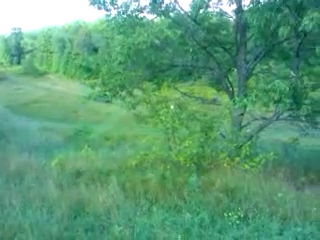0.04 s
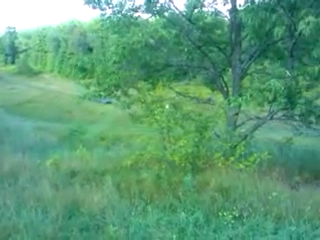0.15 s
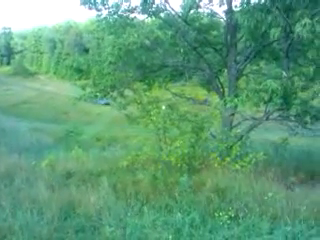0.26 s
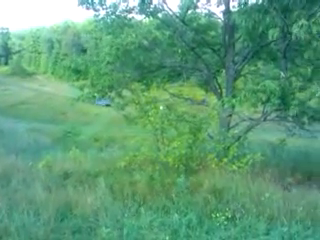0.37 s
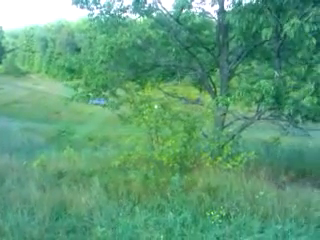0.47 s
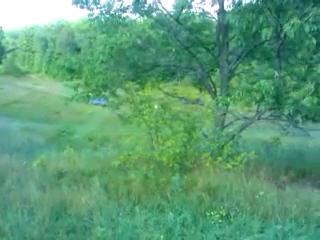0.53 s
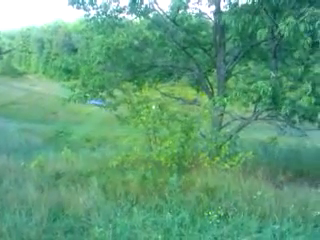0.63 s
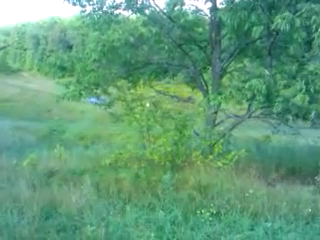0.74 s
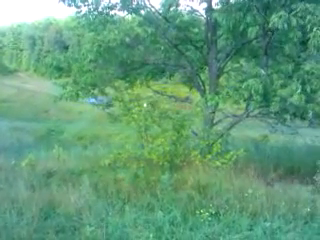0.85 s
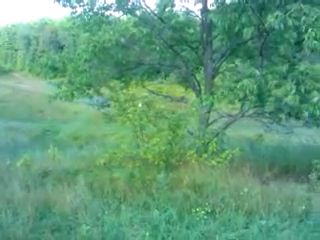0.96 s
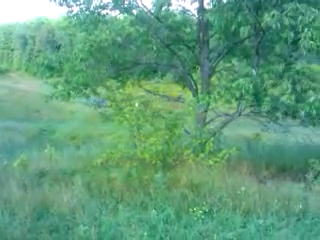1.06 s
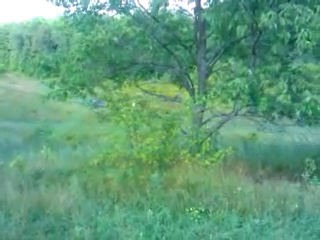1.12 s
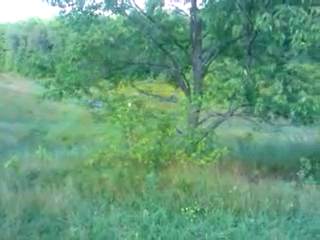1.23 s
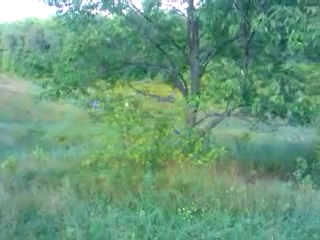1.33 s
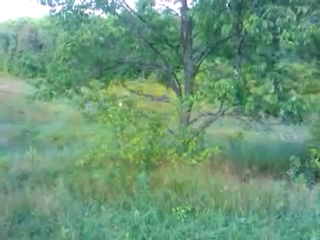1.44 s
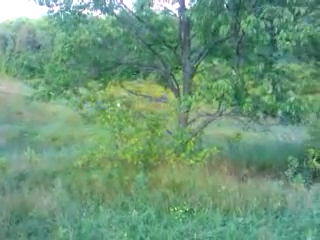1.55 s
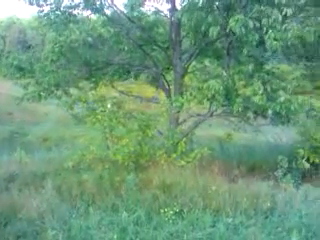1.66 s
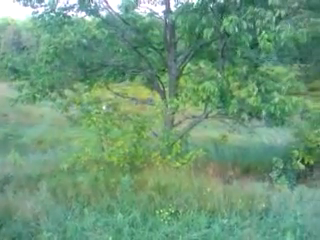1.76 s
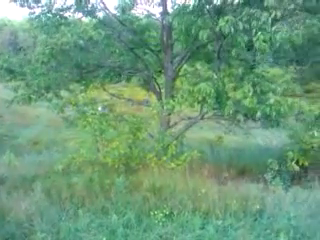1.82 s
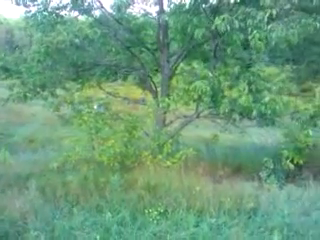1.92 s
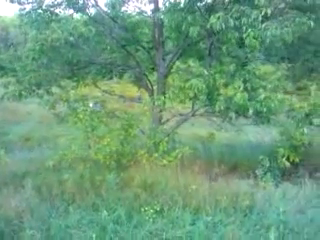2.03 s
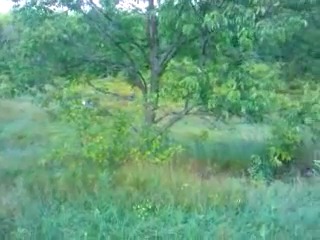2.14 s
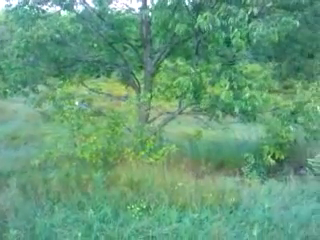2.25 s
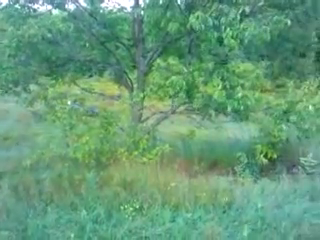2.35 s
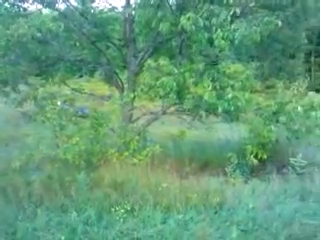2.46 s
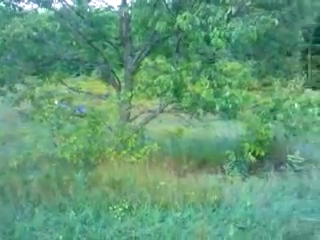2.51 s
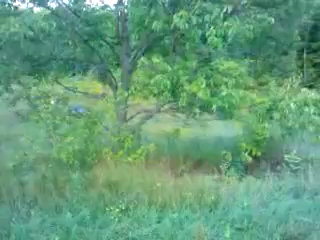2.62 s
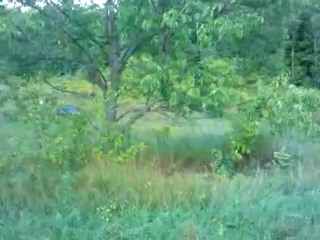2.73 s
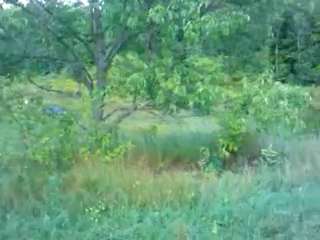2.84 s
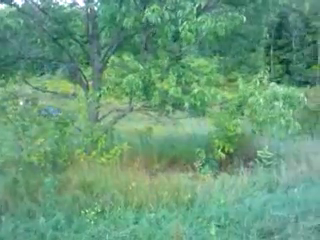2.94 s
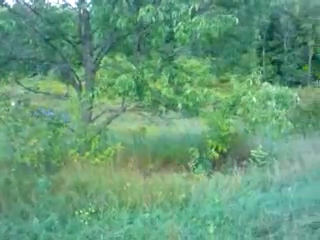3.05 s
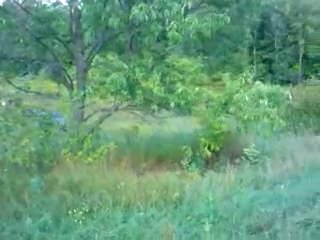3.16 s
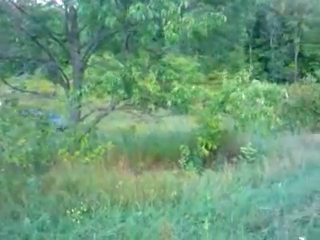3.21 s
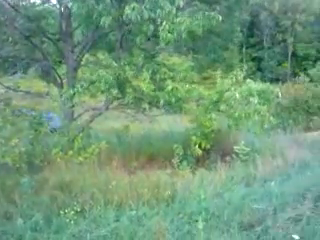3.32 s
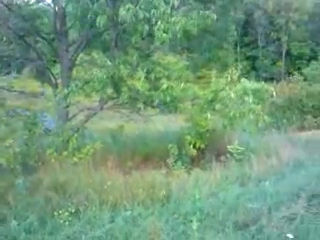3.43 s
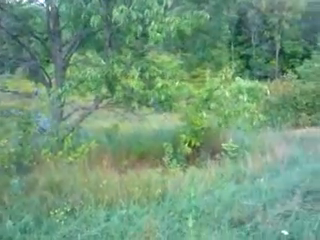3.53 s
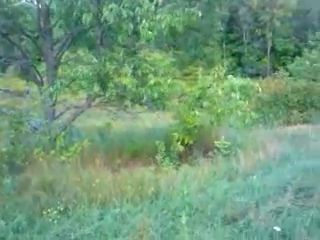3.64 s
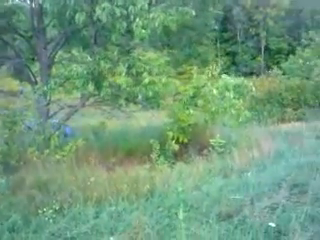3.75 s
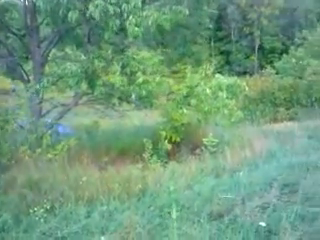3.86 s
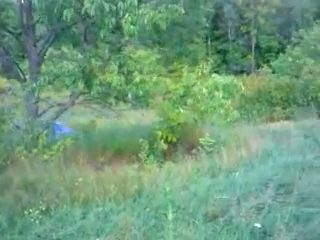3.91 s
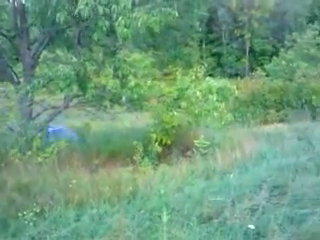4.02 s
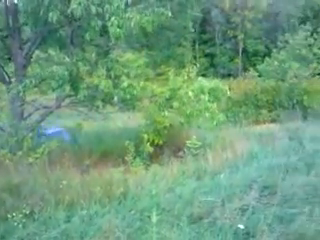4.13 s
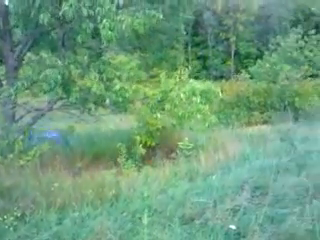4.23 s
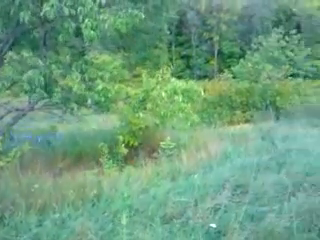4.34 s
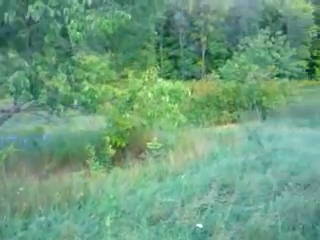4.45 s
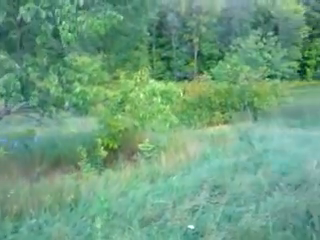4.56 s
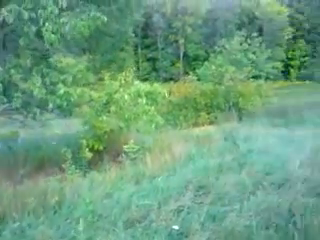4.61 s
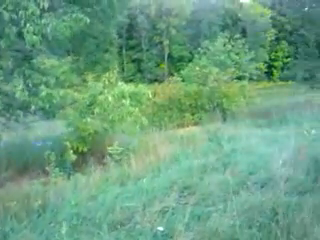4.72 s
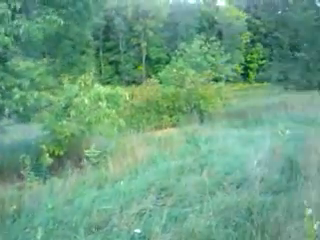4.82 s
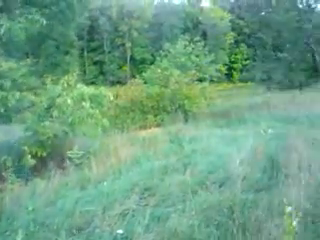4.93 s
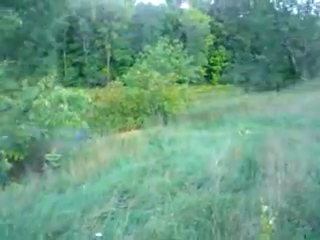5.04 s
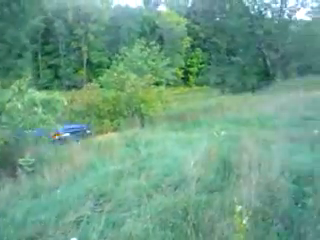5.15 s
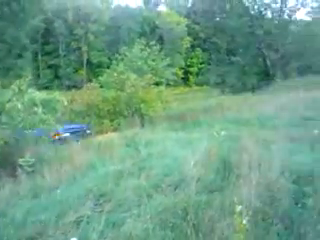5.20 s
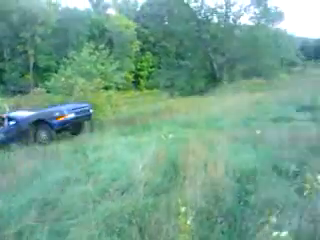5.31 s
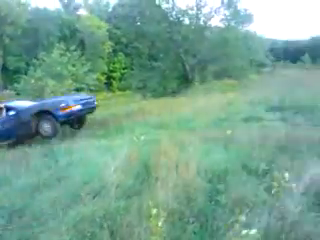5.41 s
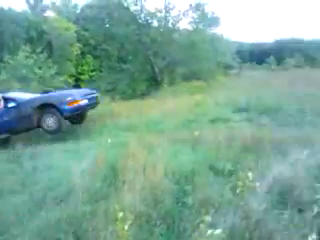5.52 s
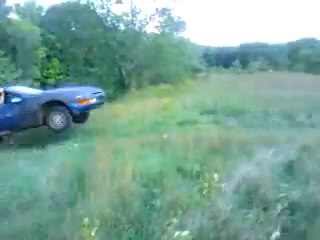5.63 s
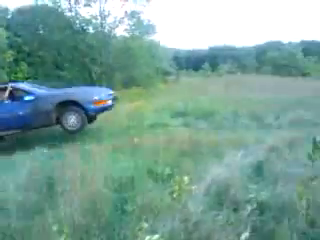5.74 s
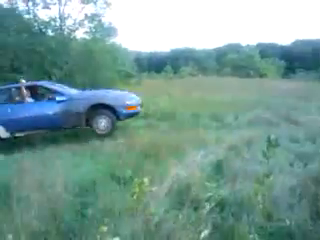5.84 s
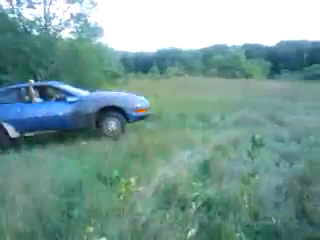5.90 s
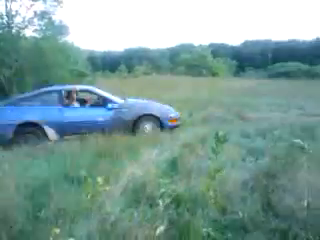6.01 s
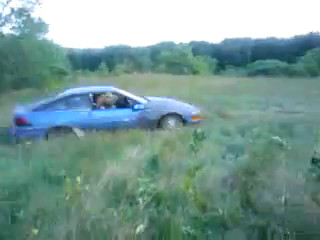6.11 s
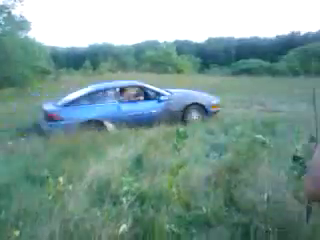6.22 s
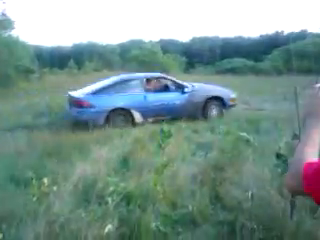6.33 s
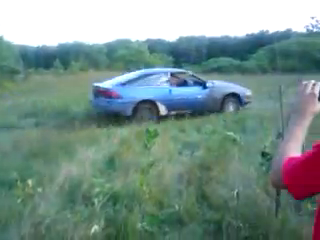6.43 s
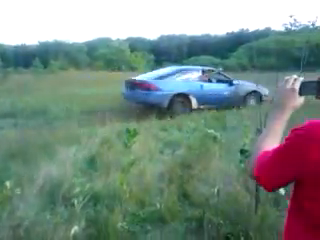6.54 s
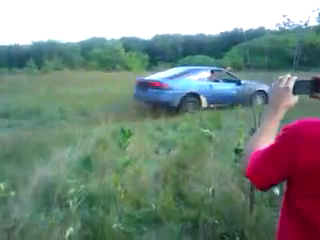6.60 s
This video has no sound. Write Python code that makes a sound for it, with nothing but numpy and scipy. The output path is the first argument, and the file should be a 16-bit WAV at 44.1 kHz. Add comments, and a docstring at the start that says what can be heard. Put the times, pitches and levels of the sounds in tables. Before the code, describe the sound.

For the first second and a half, a small car's engine drones faintly across a field, rising in pitch, while grass stirs and a hand knocks softly on the microphone. The engine drops away briefly, then gives two raspy throttle blips around 2 seconds. From 2.5 seconds it pulls hard, the blown exhaust buzzing harshly with short clanks of loose metal. It lifts near 4 seconds, then comes back louder with a low exhaust note and tyres pounding the turf, the rasp dipping just before 5 seconds. The wheels thump onto a jump at about 5.4 seconds, and the engine revs up to a howl as the car passes a few metres away, overloading the dull microphone. It lands at about 6.2 seconds with a thud, a clank and a throbbing exhaust boom, and is still driving on at 6.7 seconds.

```python
"""A small four-cylinder car with a blown exhaust, driven hard over a grass field, heard from the edge.
Gas puffs through the leak and rasps at each stab of the throttle; the silencer growls, the tailpipe
booms, loose metal clanks and the tyres pound over tussocks. The car revs over a jump about four metres
away, intake howling, and lands. At first the grass stirs and the hand-held camera knocks softly;
its dull microphone overloads as the car passes."""
import sys
import numpy as np
from scipy import signal
from scipy.fft import rfft, irfft, next_fast_len
from scipy.io import wavfile
from scipy.ndimage import uniform_filter1d

SR = 44100
rng = np.random.default_rng(int(sys.argv[2]) if len(sys.argv) > 2 else 0)


def bounce(signal):
    """Save signal as a 16-bit WAV file at the path given by the first command-line argument."""
    frames = np.transpose(np.atleast_2d(signal))
    limited = np.clip(frames, -1, 1)
    pcm = np.round(limited * 32767).astype(np.int16)
    wavfile.write(sys.argv[1], SR, pcm)


N = 294096
TIME = np.arange(N) / SR

# Engine speed. Each row: time in seconds, firings per second.
FIRING_RATE = [(0, 121), (1.45, 154), (1.8, 80), (2.1, 92.5), (3.0, 87.6), (3.87, 102.7), (4.1, 95),
               (4.27, 114.5), (4.42, 110), (4.6, 114), (4.73, 109), (5.05, 116), (5.2, 126.5), (5.49, 107),
               (5.68, 140), (5.87, 171), (6.02, 184), (6.12, 179), (6.28, 168), (6.39, 156), (6.55, 151),
               (6.67, 164)]
# Stabs of the throttle. Each row: opening and closing time in seconds, then the rasp's drive in dB at each.
THROTTLE_STABS = [(1.831, 2.036, 2.5, -9.5), (2.101, 2.201, 4, -11), (2.486, 3.912, -1, -3.5),
                  (4.149, 5.522, -7, -7.5), (5.531, 6.031, -7, -7), (6.052, 6.316, -13, -9),
                  (6.367, 6.401, 2.5, -14), (6.438, 6.66, -19, -36.5)]
# The leak's broad resonance. Each row: frequency in Hz, relative level in dB.
LEAK_SPECTRUM = [(100, -31), (250, -27.5), (450, -21.5), (720, -16), (950, -13.5), (1150, -2.5),
                 (1350, 8.5), (1570, 3.5), (1850, 11.5), (2150, 8.5), (2400, 7), (2700, -2.5), (3250, -6.5),
                 (3700, -16), (4200, -28)]
# Tone of the rasp as the car turns. Each row: time in seconds, then low band, shoulder and top band
# in dB against the rasp's core.
RASP_TONE = [(0, -9.5, -17, -11.5), (1.4, -10.5, -13, -19), (1.6, -13.5, -2, -15), (2.1, -10.5, -18, -11),
             (2.65, -14.5, -9.5, -19), (3.1, -8.5, -18, -14.5), (3.65, -11, -7.5, -19),
             (4.4, -19, -28.5, -14), (5.5, -14, -17, -13.5), (5.75, -11.5, -13, -9),
             (6.67, -7, -17.5, -15.5)]
# Narrow exhaust resonances. Each row: pitch in Hz when cold, pitch in Hz when hot, relative level in dB.
EXHAUST_RINGS = [(1414, 1560, -6), (1967, 2230, -6), (2430, 3170, -14.5)]
# A tree, then a bushy hollow, screen the rasp from the microphone.
# Each row: centre in seconds, loss in dB, half length in seconds.
COVER = [(3.214, 3.5, .28), (4.81, 9.0, 0.18)]
# Echoes off the edge of the wood. Each row: delay in seconds, gain in dB.
TREE_ECHOES = [(.023, -16.5), (.047, -8.5), (.083, -34.5), (.131, -14)]
# The tailpipe note. Each row: multiple of the firing rate, relative dB from the front, then from behind.
PIPE_HARMONICS = [(1, -20, -25), (1.25, -23.5, -23.5), (1.5, -24.5, -16.5), (1.75, -20, -5), (2, -4, -5.5),
                  (2.25, -18.5, -23), (3, -16, -17.5), (4, -22, -20.5), (5, -19.5, -39.5)]
# The note swells under load. Each row: start and end in seconds, then the gain in dB at each.
PIPE_SWELLS = [(0, 1.43, -35, -38.5), (2.5, 3.9, -38, -28), (4.17, 4.33, -19, -18),
               (4.46, 4.64, -21.5, -17.5), (4.72, 5.04, -18, -19.5), (5.2, 5.85, -17, -31.5),
               (6.07, 6.33, -18.5, -9), (6.46, 6.67, -18.5, -19.5)]
# Tyres on turf. Each row: frequency in Hz, relative level in dB.
TYRE_SPECTRUM = [(20, -31.5), (40, -14.5), (80, 1.5), (160, -3), (300, 2.5), (600, 1), (1500, -31)]
# The wheels hit a bump and the ramp, leave it, land and rebound.
# Each row: centre in seconds, level in dB at the closest distance, half length in seconds.
WHEEL_JOLTS = [(4.264, -30.5, 0.12), (5.35, -24, 0.096), (5.643, -24.5, 0.066), (5.87, -37, 0.028),
               (6.19, -24, .07), (6.55, -34.5, 0.23)]
# Leaves and tall grass all round. Each row: frequency in Hz, relative level in dB.
FOLIAGE_SPECTRUM = [(30, -27), (80, -14.5), (180, -9.5), (280, 4.5), (450, 2.5), (640, 3), (900, -16),
                    (1350, 6), (2100, -16.5), (3000, -14), (3600, -7.5), (4200, -26)]
# Stalks near the microphone. Each row: centre in seconds, level in dB, pitch in Hz, half length in seconds.
GRASS_RUSTLES = [(0.014, -47, 2190, 0.015), (0.275, -48, 1490, 0.017), (0.433, -54, 2560, 0.029),
                 (0.574, -46, 1450, .015), (0.667, -48, 2450, 0.012)]
# The hand shifts on the camera. Each row: time in seconds, relative peak in dB, pitch in Hz.
HAND_KNOCKS = [(0.058, -34, 318), (0.136, -33, 417), (0.163, -38, 221), (0.228, -42, 277),
               (0.294, -36.5, 339), (0.363, -32.5, 325), (0.403, -29.5, 298), (0.434, -27.5, 297),
               (0.478, -31.5, 310), (0.535, -30.5, 300), (0.633, -39, 258), (0.662, -36, 264),
               (0.7, -40, 251), (1.055, -24.5, 288), (1.725, -44, 272), (1.825, -33, 278)]
# Loose metal and sharp exhaust cracks.
# Each row: start in seconds, relative peak in dB, pitch in Hz, seconds to fall by 60 dB.
METAL_CLANKS = [(1.821, -23, 1690, .015), (1.935, -16, 2110, .015), (2.111, -35, 2030, 0.015),
                (2.484, -21.5, 1930, .03), (2.508, -24, 1900, .012), (2.639, -7.5, 1950, 0.01),
                (2.722, -7.5, 2136, 0.022), (2.855, -9, 1850, 0.0109), (2.983, -9.5, 1840, 0.012),
                (3.19, -21, 3140, 0.034), (3.314, -10, 2290, 0.041), (3.356, -8, 1910, 0.0077),
                (3.676, -9.5, 1610, .06), (3.718, -8.5, 1910, 0.0094), (4.142, -21, 1940, .015),
                (4.176, -21.5, 1910, .011), (4.400, -6, 2150, 0.068), (4.508, -14, 1920, 0.0084),
                (4.538, -6, 2160, .015), (4.561, -7.5, 1544, .015), (4.721, -13.5, 1720, .02),
                (5.035, -20, 1770, .015), (5.265, -4.5, 1580, 0.014), (5.281, -2, 1760, 0.0087),
                (5.425, -3, 1710, .02), (6.222, -6, 1375, 0.11), (6.398, -8, 1660, 0.028)]
# Brief tones in the rasp. Each row: centre in seconds, pitch in Hz, relative dB, half length in seconds.
RASP_FLARES = [(3.1, 1566, 0, 0.072), (3.564, 1203, -5, 0.078), (3.686, 1570, -1, .05),
               (4.411, 2100, -1.5, 0.05), (5.166, 2515, -1.5, 0.061), (5.43, 2382, -4, 0.078),
               (5.534, 1689, -0.5, 0.0709), (5.72, 1312, -5, 0.092), (5.91, 2187, -4.5, 0.079),
               (6.2, 1414, -4.5, 0.06)]
# The intake's high-revving howl. Each row: start and end in seconds, then the level in dB at each.
INTAKE_HOWL = [(5.72, 6.04, -21, -20)]

PASS_S, CLOSEST_M, CAR_M_PER_S, SOUND_M_PER_S = 5.874, 3.74, 13.2, 343
SWELL_ATTACK_S, SWELL_RELEASE_DB_PER_S = .06, 174.5


def from_db(db):
    """Decibels to gain."""
    return 10 ** (np.asarray(db) / 20)


def rms_one(x):
    """Scale to unit power."""
    return x / np.sqrt(np.mean(x ** 2) + 1e-20)


def in_time(rows):
    """Each column of a curve at every sample."""
    times, *columns = np.transpose(rows)
    return [np.interp(TIME, times, column) for column in columns]


def drift(hz):
    """A smooth random wander with spread 1, mostly slower than hz."""
    step, settle = 40, 2000
    pole = np.exp(-2 * np.pi * hz * step / SR)
    white = rng.standard_normal(N // step + settle + 2)
    slow = signal.lfilter([1], [1, -2 * pole, pole * pole], white)[settle:]
    return np.interp(np.arange(N) / step, np.arange(len(slow)), rms_one(slow))


def coloured(x, spectrum):
    """Pass a signal through a smooth response; unit power."""
    hz, db = np.transpose(spectrum)
    size = next_fast_len(N)
    log_hz = np.log(np.arange(size // 2 + 1) * SR / size + 1)
    response = from_db(np.interp(log_hz, np.log(hz), db))
    return rms_one(irfft(rfft(x, size) * response, size)[:N])


def band(x, edges_hz, kind, order):
    """Butterworth filter."""
    return signal.sosfilt(signal.butter(order, edges_hz, kind, fs=SR, output="sos"), x)


def hump(at, half_s):
    """A smooth rise and fall of height 1."""
    return np.exp(-((TIME - at) / half_s) ** 2)


def strokes(rows, attack_s, release_db_per_s):
    """Gain of a run of gestures: each rises, slides from its first level to its last, and dies away."""
    gain = 0
    for start, end, first_db, last_db in rows:
        attack = np.clip((TIME - start) / attack_s, 0, 1)
        held_db = np.interp(TIME, [start, end], [first_db, last_db])
        fall_db = release_db_per_s * np.maximum(TIME - end, 0)
        gain = gain + attack * from_db(held_db - fall_db)
    return gain


def drive_past():
    """Distance gain (1 when closest), Doppler factor, and how far the tail faces the microphone (0-1)."""
    along = CAR_M_PER_S * (TIME - PASS_S)
    distance = np.hypot(along, CLOSEST_M)
    doppler = 1 / (1 + CAR_M_PER_S * along / distance / SOUND_M_PER_S)
    behind = np.interp(TIME, [5.5, 5.91], [0, 1])
    return CLOSEST_M / distance, doppler, behind


def gas_flow(firings, rate, puff_s=0.0029, hiss=0.72):
    """Firings crack and puff through the leak; far off at first, and close by, rush fills the gaps."""
    index = firings.astype(int)
    cylinder_db = np.array([1.0, -2.5, -0.78, -2.0])
    uneven_db = rng.standard_normal(index[-1] + 1)
    strength = from_db(uneven_db[index] + cylinder_db[index % 4])
    age_s = (firings - index) / rate
    close_by = np.interp(TIME, [5.0, 5.55, 6.4, 6.67], [0.004, 1, 1, .5])
    far_off = np.interp(TIME, [1.6, 1.85], [1, 0])
    turbulence = strength * np.exp(-age_s / puff_s) + hiss + close_by + far_off
    cracks = strength * np.diff(index, prepend=0)
    flow = turbulence * rng.standard_normal(N) + cracks
    return flow / np.sqrt(uniform_filter1d(flow ** 2, size=2000))


def gas_heat(warming_s=0.66):
    """The exhaust warms while the throttle is open and cools when it is shut; 0-1."""
    is_open = sum((TIME > opens) & (TIME < closes) for opens, closes, _, _ in THROTTLE_STABS)
    retained = np.exp(-1 / (warming_s * SR))
    return signal.lfilter([1 - retained], [1, -retained], is_open)


def pipe_ring(flow, hz, width_hz, wander=0.03, waver_db=3.5):
    """The flow through one narrow resonance; gusts of gas bend its centre and sway its strength."""
    centre_hz = hz * (1 + wander * drift(7.0))
    carrier = np.exp(2j * np.pi * np.cumsum(centre_hz) / SR)
    ring = (band(flow / carrier, width_hz / 2, "low", order=2) * carrier).real
    return rms_one(ring * from_db(waver_db * drift(6.8)))


def exhaust_rings(eddies, doppler, widths_hz=(105, 105, 300)):
    """Eddies sound three resonances of the exhaust, which rise as the gas heats."""
    heat = gas_heat()
    return [from_db(db) * pipe_ring(eddies, doppler * (cold_hz + heat * (hot_hz - cold_hz)), width_hz)
            for (cold_hz, hot_hz, db), width_hz in zip(EXHAUST_RINGS, widths_hz)]


def rasp(flow, throttle, coasting_db=-26, patchy_db=1.5, flutter_db=1.74):
    """Leaking gas sounds through a broad hump near 2 kHz and narrow rings; coasting flattens the hump."""
    nearness, doppler, _ = drive_past()
    effort = np.hypot(throttle, from_db(coasting_db))
    coasting = from_db(coasting_db) / effort
    leak = coloured(flow, LEAK_SPECTRUM)
    low_db, shoulder_db, top_db = [db + patchy_db * drift(21) for db in in_time(RASP_TONE)]
    low = from_db(low_db + 5 * coasting) * rms_one(band(leak, 1000, "low", order=8))
    shoulder = from_db(shoulder_db) * rms_one(band(leak, [1000, 1350], "band", order=3))
    middle = from_db(-1) * rms_one(band(leak, [1350, 2750], "band", order=8))
    top = from_db(top_db + 2 * coasting) * rms_one(band(leak, 2750, "high", order=8))
    eddies = flow * rng.standard_normal(N)  # fresh noise, in step with the puffs
    low_ring, middle_ring, high_ring = exhaust_rings(eddies, doppler)
    core = middle + low_ring + middle_ring + flares(eddies)
    # held at steady power, so a flare narrows the core without making it louder
    core = core / np.sqrt(uniform_filter1d(core ** 2, size=1500))
    screened_db = sum(loss_db * hump(at, half_s) for at, loss_db, half_s in COVER)
    level = nearness * effort * from_db(flutter_db * drift(8.9) - screened_db)
    return level * (core + low + shoulder + top + high_ring)


def silencer(flow, hz=638, front_db=-35, rear_db=-21.5, coasting_db=-6):
    """Eddies growl in the hollow silencer box, louder from close behind, fainter off the throttle."""
    nearness, doppler, behind = drive_past()
    spans = [(start, end, 0, 0) for start, end, _, _ in [*PIPE_SWELLS, *THROTTLE_STABS]]
    pulling = np.minimum(strokes(spans, SWELL_ATTACK_S, SWELL_RELEASE_DB_PER_S), 1)
    db = front_db + behind * nearness * (rear_db - front_db) + (1 - pulling) * coasting_db
    eddies = flow * rng.standard_normal(N)
    growl = pipe_ring(eddies, hz * doppler, width_hz=110, wander=.05, waver_db=3)
    return nearness * from_db(db) * growl


def trees(x):
    """The edge of the wood sends a few dull echoes back to the microphone."""
    dull = band(x, 1200, "low", order=1)
    return sum(from_db(db) * np.interp(TIME - delay, TIME, dull, left=0) for delay, db in TREE_ECHOES)


def tailpipe(firings, waver_db=1.35, rough_db=2.0):
    """Ragged low harmonics of the firing; from behind, the uneven cylinders make the note throb."""
    nearness, _, behind = drive_past()
    note = 0
    for multiple, front_db, rear_db in PIPE_HARMONICS:
        facing_db = front_db + behind * (rear_db - front_db)
        gain = from_db(facing_db + waver_db * drift(2.2) + rough_db * drift(30))
        note = note + gain * np.sin(2 * np.pi * (multiple * firings + rng.random()))
    load = strokes(PIPE_SWELLS, SWELL_ATTACK_S, SWELL_RELEASE_DB_PER_S)
    return np.sqrt(2) * nearness * load * note


def wheels(throttle, rolling_db=-34.5, pulling_db=-29, lumpy_db=3.0):
    """Tyres pound over tussocks, harder under power, and thump at the jump."""
    nearness, _, _ = drive_past()
    jolts = sum(from_db(db) * hump(at, half_s) for at, db, half_s in WHEEL_JOLTS)
    rolling = from_db(rolling_db) * nearness  # distance counts twice: free rolling hardly carries
    level = nearness * (np.hypot(rolling, from_db(pulling_db) * throttle) + jolts)
    return level * from_db(lumpy_db * drift(16)) * coloured(rng.standard_normal(N), TYRE_SPECTRUM)


def field(level_db=-55.5, waver_db=4.0):
    """Leaves and tall grass stir faintly; a few stalks brush together near the microphone."""
    level = from_db(level_db + waver_db * drift(10))
    stirring = level * coloured(rng.standard_normal(N), FOLIAGE_SPECTRUM)
    white = rng.standard_normal(N)
    for at, db, hz, half_s in GRASS_RUSTLES:
        stalks = rms_one(band(white, [hz * .85, hz / .85], "band", order=2))
        stirring = stirring + from_db(db) * hump(at, half_s) * stalks
    return stirring


def knock(at, hz, t60, rise_s):
    """A struck part rings at one pitch, swelling over its rise time and dying away; peak 1."""
    t = np.arange(SR // 4) / SR
    attack = 1 - np.exp(-(t / rise_s) ** 2)
    ring = np.sin(2 * np.pi * hz * t) * from_db(-60 * t / t60) * attack
    track, start = np.zeros(N + len(t)), int(at * SR)
    track[start:start + len(t)] = ring / np.abs(ring).max()
    return track[:N]


def handling(knock_db=-2, rub_db=-3):
    """Right at the microphone, soft knocks ring in the camera's case and the fingers rub around them."""
    knocks = sum(from_db(db) * knock(at - .003, hz, t60=0.017, rise_s=0.0063)
                 for at, db, hz in HAND_KNOCKS)
    knock_power = uniform_filter1d(uniform_filter1d(knocks ** 2, size=1300), size=700)
    pressure = np.sqrt(np.abs(knock_power))
    gripping = np.interp(TIME, [.75, 1.0], [1, .2])
    rub = rms_one(band(rng.standard_normal(N), [220, 440], "band", order=3))
    return from_db(knock_db) * knocks + from_db(rub_db) * gripping * pressure * rub


def clanks(gain_db=-2):
    """Short rings from the shaken exhaust and underbody."""
    return sum(from_db(db + gain_db) * knock(at, hz, t60, rise_s=0.0011)
               for at, db, hz, t60 in METAL_CLANKS)


def flares(eddies, half_width_hz=40):
    """Narrow bands of the eddies swell out of the rasp as tones and sink back."""
    tones = 0
    for at, hz, db, half_s in RASP_FLARES:
        tone = rms_one(band(eddies, [hz - half_width_hz, hz + half_width_hz], "band", order=2))
        tones = tones + from_db(db) * hump(at, half_s) * tone
    return tones


def intake(firings, sixth_db=-4.0, waver_db=3):
    """Revving high over the jump, the unloaded engine howls on its fourth and sixth harmonics."""
    phase = 2 * np.pi * firings
    howl = np.sin(4 * phase) + from_db(sixth_db) * np.sin(6 * phase)
    swell = strokes(INTAKE_HOWL, attack_s=0.18, release_db_per_s=133)
    return swell * from_db(waver_db * drift(17)) * howl


def scene(jitter=.01):
    """One microphone at the field's edge: the car and its echoes, the grass, the hand on the camera."""
    rate = in_time(FIRING_RATE)[0] * (1 + jitter * drift(15))
    firings = np.cumsum(rate) / SR
    throttle = strokes(THROTTLE_STABS, attack_s=0.05, release_db_per_s=259.5)
    flow = gas_flow(firings, rate)
    harsh = rasp(flow, throttle) + silencer(flow) + clanks()
    car = harsh + trees(harsh) + tailpipe(firings) + intake(firings) + wheels(throttle)
    return (car + field() + handling())[None]


def record(dry, mic_top_hz=4155, overload=.72, splash_top_hz=15800):
    """A dull microphone, then overload, which splashes treble over the loudest peaks."""
    heard = band(dry, mic_top_hz, "low", order=22)
    clipped = np.clip(heard, -overload, overload)
    treble_limit = signal.ellip(10, .05, 60, splash_top_hz, fs=SR, output="sos")
    return signal.sosfiltfilt(treble_limit, clipped)


dry = scene()
out = record(dry)
bounce(out)
```